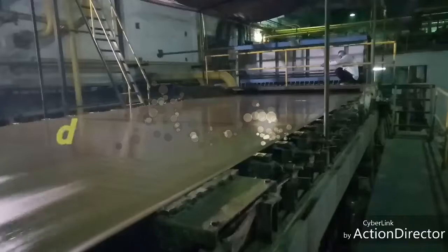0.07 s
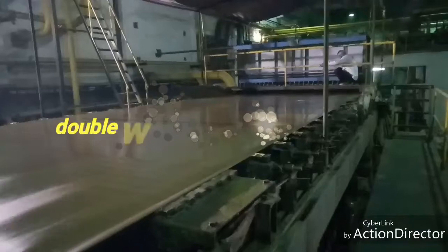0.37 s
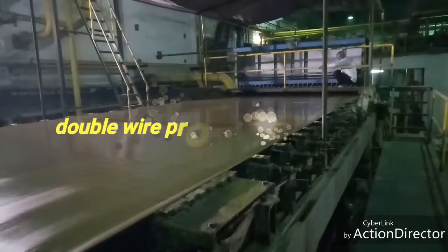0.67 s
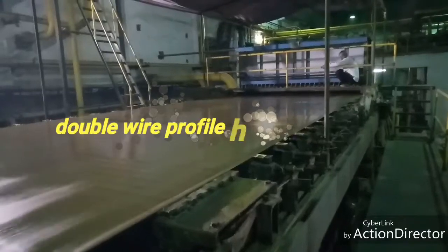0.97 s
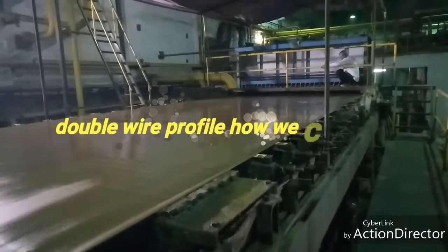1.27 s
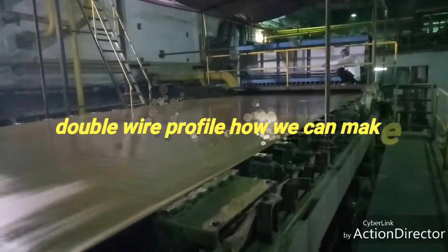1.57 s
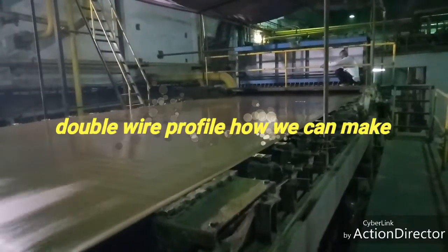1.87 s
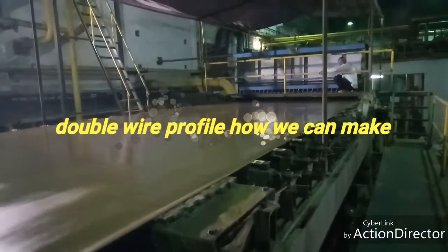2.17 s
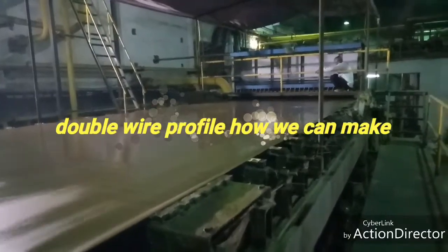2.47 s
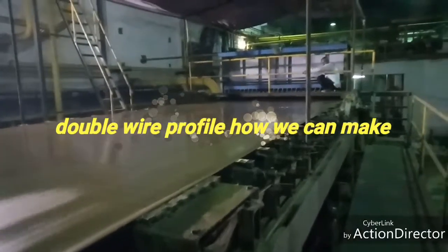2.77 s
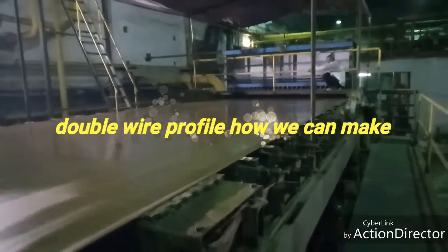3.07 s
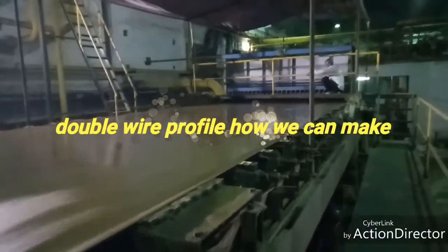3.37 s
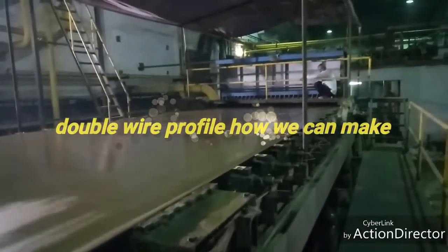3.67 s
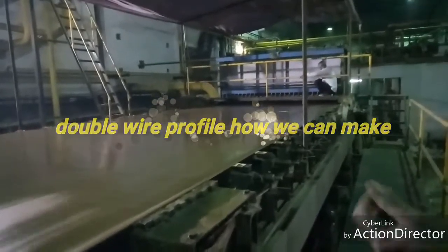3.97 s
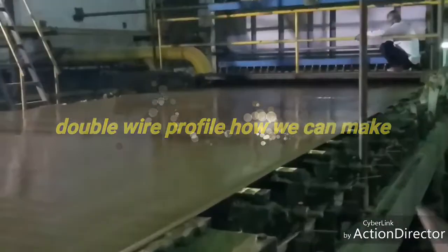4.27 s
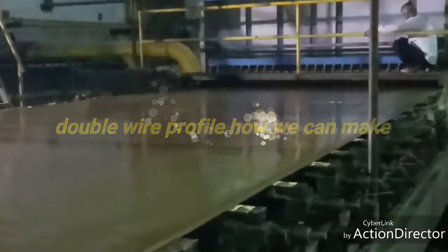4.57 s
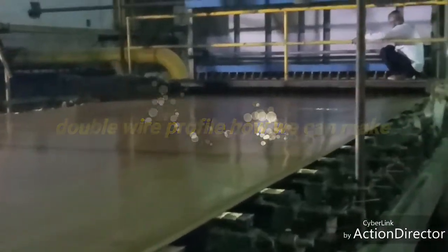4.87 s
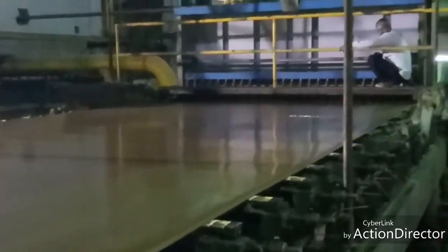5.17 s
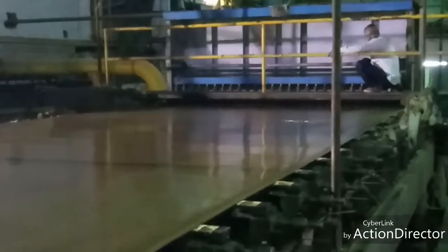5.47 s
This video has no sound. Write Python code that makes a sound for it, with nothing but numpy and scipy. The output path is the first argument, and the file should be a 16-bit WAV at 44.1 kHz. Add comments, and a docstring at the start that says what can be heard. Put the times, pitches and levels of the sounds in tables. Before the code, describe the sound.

A shrill, stuttering squeal rides over the steady roar, hum and watery hiss of a large machine in an echoing mill.

```python
"""A rubbing part of a paper machine squeals, shrill and fluttering, as it bites and slips.
Behind it, drives and pumps hum and throb, water hisses off the moving wire, and the rolls
and pumps blend into a deep roar. The machine is on the left of a big mill hall whose echoes
smear the tones. The sound fades in after a short silence; one dry click comes near the end."""
import sys
import numpy as np
from scipy import signal
from scipy.fft import rfft, irfft, next_fast_len
from scipy.io import wavfile
from scipy.ndimage import uniform_filter1d, map_coordinates

SR = 44100
rng = np.random.default_rng(int(sys.argv[2]) if len(sys.argv) > 2 else 0)


def dump_mix(stems):
    """Bounce the given channels to the path in sys.argv[1] as a 16-bit WAV at rate SR."""
    frames = np.atleast_2d(stems).T  # one column per channel
    limited = np.clip(frames, -1, 1)  # hard clip at full scale
    pcm = np.round(limited * 32767).astype(np.int16)
    wavfile.write(sys.argv[1], SR, pcm)


N = 243873


def amp(db):
    """Decibels to gain."""
    return 10 ** (np.asarray(db) / 20)


def unit(x):
    """Scale to rms 1."""
    return x / np.sqrt(np.mean(np.abs(x) ** 2) + 1e-20)


def over_freq(rows, hz):
    """Interpolate (freq_hz, value) rows on a log axis."""
    freq_hz, values = np.transpose(rows)
    return np.interp(np.log(hz + 1), np.log(freq_hz + 1), values)


def over_time(rows):
    """Interpolate (time_s, value) rows to one value per sample."""
    return np.interp(np.arange(N) / SR, *np.transpose(rows))


def wobble(rate_hz):
    """Smooth random curve, rate_hz knots a second."""
    coarse = np.arange(0, N + 64, 64)
    spline = map_coordinates(rng.standard_normal(2048), [coarse * rate_hz / SR], mode="wrap")
    return np.interp(np.arange(N), coarse, spline)


def swell(middle_s, length_s):
    """Power envelope: quick rise, hold at 1, quick fall."""
    distance = np.minimum(np.abs(2 * (np.arange(N) / SR - middle_s) / length_s), 10)
    return np.exp(-distance ** 4)


def filtered(x, response):
    """Apply the gain response(hz) by FFT."""
    size = next_fast_len(N + 8192)
    return irfft(rfft(x, size) * response(np.fft.rfftfreq(size, 1 / SR)), size)[..., :N]


# Likeness of the two sides: freq_hz, coherence
HALL_COHERENCE = [(60, .98), (180, .97), (380, .84), (600, .42), (1000, .26), (1250, 0), (1700, -.25),
                  (2200, -.08), (2700, .15), (3600, 0)]
# Left side over right: freq_hz, excess_db
LEFT_EXCESS = [(60, 7.5), (300, 8), (800, 6.5), (1100, 8), (2000, 8), (3300, 10), (4300, 13), (5500, 8),
               (6600, 5.5), (7300, -0.5), (10000, 0.5), (13000, 17)]


def hall_noise(colour_db, patchy_db):
    """Diffuse stereo noise of rms 1, with patches of random gain, leaning left."""
    def mid_side_gain(hz):
        angle = np.arccos(over_freq(HALL_COHERENCE, hz)) / 2
        return amp(colour_db(hz)) * [np.cos(angle), np.sin(angle)]

    spectra = signal.stft(rng.standard_normal((2, N)), nperseg=512)[2]
    patches = uniform_filter1d(rng.standard_normal(spectra.shape[1:]), 7, axis=0)
    patches = unit(uniform_filter1d(patches, 12, axis=1))
    noise = signal.istft(spectra * amp(patchy_db * patches), nperseg=512)[1][:, :N]
    mid, side = filtered(noise, mid_side_gain)
    lean_left = lambda hz: amp([0 * hz, -over_freq(LEFT_EXCESS, hz)])
    return unit(filtered(np.array([mid + side, mid - side]), lean_left))


def hall_scatter(width_hz):
    """Many hall paths summed: a random complex gain per side that spreads a tone into a band."""
    hz = np.fft.fftfreq(next_fast_len(N), 1 / SR)
    paths = rng.standard_normal((2, len(hz))) + 1j * rng.standard_normal((2, len(hz)))
    return unit(np.fft.ifft(paths / np.sqrt(1 + (hz / width_hz) ** 4))[:, :N])


# Roll and pump noise: freq_hz, relative_density_db
ROAR_SPECTRUM = [(22, -12), (39, -22), (60, -8.5), (100, 1.8), (170, 2), (250, 2), (320, 1.5), (420, -3),
                 (560, -5.5), (820, -7.5), (910, -8.5), (1060, -6.5), (1250, -9.5), (2000, -16.5)]


def roar(level_db=-20, edge_hz=2100):
    """Rolls and pumps blend in the hall into a deep, nearly even roar."""
    colour_db = lambda hz: over_freq(ROAR_SPECTRUM, hz) - 10 * np.log10(1 + (hz / edge_hz) ** 10)
    swell_db = 0.12 * wobble(2.5) + 0.3 * wobble(14)
    return amp(level_db + swell_db) * hall_noise(colour_db, patchy_db=1)


# Water spraying and draining: freq_hz, relative_density_db
SPRAY_SPECTRUM = [(900, -25), (1700, -0.5), (2800, 2.5), (3700, 3), (4400, 1), (5100, -9), (6000, -11.5),
                  (6500, -9.5), (7600, -19), (8100, -24), (9000, -28.5), (11000, -29), (13000, -25),
                  (15000, -28.5)]


def spray(level_db=-27):
    """Water flung and sucked from the wire makes a smooth hiss."""
    colour_db = lambda hz: over_freq(SPRAY_SPECTRUM, hz)
    swell_db = 0.2 * wobble(3.12) + 0.046 * wobble(22)
    return amp(level_db + swell_db) * hall_noise(colour_db, patchy_db=0.66)


# Drive, gear and pump tones: pitch_hz, left_db, right_db
HUM_TONES = [(100.1, -42, -49), (126.1, -38, -45), (127.0, -35, -43), (176.5, -40, -49), (199.5, -35, -44),
             (243.5, -34, -43), (252.4, -39, -46), (259.4, -38, -47), (265.9, -34, -41), (268.5, -38, -49),
             (291.4, -35, -44), (316.4, -40, -48), (343.3, -42, -52), (391.1, -40, -46), (399.0, -42, -53),
             (458.2, -44, -50), (533.0, -42, -60), (557.9, -41, -50), (561.9, -36, -55), (611.8, -36, -53),
             (661.6, -43, -45), (724.7, -47, -42), (749.6, -41, -58), (772.6, -42, -53),
             (774.5, -31.7, -45), (780.5, -38, -47), (799.5, -45, -46), (824.4, -38.2, -40.5),
             (830.4, -38.5, -46.5), (849.3, -45, -56), (855.3, -46, -57), (1015.5, -46, -50),
             (1038.6, -37, -46), (1041.0, -33.5, -44), (1049.0, -35, -53), (1065.9, -42, -48),
             (1088.5, -41, -56), (1090.9, -46, -43), (1098.8, -41, -65), (1140.8, -45, -54),
             (1197.1, -42, -50), (1317.4, -40, -53), (1354.4, -47, -55), (1396.5, -48, -60),
             (1623.9, -40.5, -52), (1854.4, -48, -55), (1904.3, -48, -61), (3271.6, -47.5, -54)]


def drive_hum(waver=0.24, waver_rate_hz=8, apart_hz=1300):
    """Steady machine tones; weak echoes waver their level and phase, and close pairs beat."""
    t = np.arange(N) / SR
    out = np.zeros((2, N))
    echoes = [waver * wobble(waver_rate_hz) for _ in range(8)]
    for pitch_hz, left_db, right_db in HUM_TONES:
        lag_rad = min(pitch_hz / apart_hz, 1) ** 2 * rng.normal()  # short waves differ more by side
        phase = 2 * np.pi * (pitch_hz * t + rng.random())
        for side, level_db in enumerate([left_db, right_db]):
            gain_pick, phase_pick = rng.permutation(len(echoes))[:2]
            tone = np.cos(phase + side * lag_rad + echoes[phase_pick])
            out[side] += amp(level_db) * unit((1 + echoes[gain_pick]) * tone)
    return out


# Drives beating with the loudest one: slower_by_hz, in_phase_s, relative_db
BEATING_DRIVES = [(4.0, .238, -2), (2.53, .372, -8.5), (11.6, .063, -12), (-3.4, .132, -13)]
# Slow level changes of the throb: time_s, gain_db
THROB_GAIN = [(.45, -6), (1.05, 3), (1.65, -2), (1.97, 3.5), (2.3, -0.5), (2.9, -1), (5.5, -1.5)]


def drive_throb(pitch_hz=512, left_db=-29, right_db=-35, waver=0.12):
    """Drives at nearly the same speed beat: their tone swells and fades a few times a second."""
    t = np.arange(N) / SR
    beating = 1 + sum(amp(relative_db) * np.exp(-2j * np.pi * slower_by_hz * (t - in_phase_s))
                      for slower_by_hz, in_phase_s, relative_db in BEATING_DRIVES)
    tone = (beating * np.exp(2j * np.pi * pitch_hz * t)).real
    level_db = over_time(THROB_GAIN) + [[left_db], [right_db]]
    return amp(level_db) * unit((1 + waver * wobble(6.4)) * tone)


# Impulse of the click: start_s, impulse_db
CLICK_IMPULSE = (5.4233, -11.5)


def click(right_gain_db=-5.5, cutoff_hz=9000):
    """One brief, dry click, louder in the left channel."""
    start_s, impulse_db = CLICK_IMPULSE
    impulse = amp(impulse_db) * (np.arange(N) == round(start_s * SR))
    return amp([[0], [right_gain_db]]) * filtered(impulse, lambda hz: 1 / (1 + 1j * hz / cutoff_hz))


def slips(depth, rate_hz, jitter, sharpness):
    """Gain of rms 1 with short, uneven dips where the contact lets go."""
    cycles = rng.random() + np.cumsum(rate_hz * np.exp(jitter * wobble(rate_hz))) / SR
    return unit(1 - depth * np.abs(np.cos(np.pi * cycles)) ** (2 * sharpness))


# Flares of the squeal's octave: middle_s, level_db
OCTAVE_FLARES = [(.494, -30), (.564, -28), (.623, -28), (.736, -31), (1.327, -30), (1.41, -30),
                 (1.502, -30), (1.733, -30), (1.797, -27), (2.06, -31), (2.196, -38), (2.345, -27),
                 (2.503, -24.5), (2.735, -28), (2.812, -27), (2.92, -35), (2.973, -25.5), (3.381, -24.5),
                 (3.488, -27), (3.619, -42), (3.92, -32), (4.147, -28), (4.284, -36), (4.463, -35),
                 (4.558, -29), (4.759, -30), (5.045, -34), (5.193, -29), (5.263, -32), (5.448, -32)]


def octave_envelope(base_db=-35.5, flare_s=0.039, rough_db=2):
    """Amplitude of the squeal's octave: faint slipping with brief, rough flares."""
    rubbing = amp(base_db) * slips(depth=0.69, rate_hz=14, jitter=0.269, sharpness=2.2)
    flare_power = sum(amp(level_db) ** 2 * swell(middle_s, flare_s)
                      for middle_s, level_db in OCTAVE_FLARES)
    return np.sqrt(rubbing ** 2 + flare_power) * unit(amp(rough_db * wobble(60)))


# Bites of the rubbing part: middle_s, length_s, level_db
BITES = [(0.192, 0.052, -13), (0.271, 0.07, -17), (0.4, 0.03, -24), (0.493, 0.032, -26),
         (0.541, 0.038, -19.5), (0.612, 0.042, -22.5), (0.704, 0.032, -20), (0.784, 0.1, -21.5),
         (.865, .05, -23.5), (0.97, 0.071, -24.5), (1.123, 0.11, -15.5), (1.283, 0.087, -21),
         (1.473, 0.052, -19.5), (1.529, 0.022, -15.5), (1.595, 0.038, -15), (1.699, 0.044, -17.5),
         (1.823, 0.017, -20), (1.895, 0.058, -15.5), (1.97, 0.019, -20.5), (2.053, 0.072, -17),
         (2.216, 0.081, -17.5), (2.315, 0.031, -18), (2.372, 0.083, -21), (2.515, 0.075, -17),
         (2.585, 0.036, -16.5), (2.64, .05, -24), (2.72, .06, -16.5), (2.798, 0.051, -18.5),
         (2.897, .065, -20.5), (2.99, 0.031, -16.5), (3.106, 0.067, -16.5), (3.205, .055, -16.5),
         (3.31, 0.04, -22.5), (3.397, 0.038, -24), (3.463, 0.048, -20), (3.51, .04, -21),
         (3.578, 0.036, -25), (3.682, 0.079, -20.5), (3.827, 0.13, -14), (3.955, 0.098, -17),
         (4.092, 0.086, -14.5), (4.195, 0.12, -16.5), (4.318, 0.046, -15), (4.404, 0.049, -21.5),
         (4.49, 0.072, -15), (4.586, 0.035, -19), (4.785, 0.069, -13.5), (4.96, 0.11, -21),
         (5.035, 0.058, -15.5), (5.142, .1, -15.5), (5.254, 0.053, -16.5), (5.327, 0.052, -19),
         (5.453, 0.1, -25.5)]


def bite_envelope(slip_db=-29, shudder_hz=29, rough_db=0.53):
    """Amplitude of the fundamental: the part bites about ten times a second, shudders, lets go."""
    bite_power = sum(amp(level_db) ** 2 * swell(middle_s, length_s)
                     for middle_s, length_s, level_db in BITES)
    shudder = 1 + 0.17 * np.cos(2 * np.pi * shudder_hz * np.arange(N) / SR + wobble(5))
    roughness = amp(rough_db * wobble(75))
    return np.sqrt(amp(slip_db) ** 2 + bite_power) * unit(shudder * roughness)


def partial_gain(direct, echo_db, flutter_hz, halo_db, follow_share=0.21):
    """Complex gain per side: direct sound left, fluttering echo, hissy halo swelling with the rub."""
    effort = unit(1 - follow_share + follow_share * unit(direct))
    halo = amp(halo_db)[:, None] * effort * hall_scatter(width_hz=127)
    echo = amp(echo_db)[:, None] * hall_scatter(width_hz=flutter_hz)
    return np.outer([1, 0], direct) + echo + halo


def squeal(pitch_hz=2365.3, drift_hz=1.317, waver_hz=3):
    """A rubbing part sings on one pitch with two overtones; the hall makes them flutter."""
    freq_hz = pitch_hz + drift_hz * wobble(3) + waver_hz * wobble(20)
    carrier = np.exp(2j * np.pi * np.cumsum(freq_hz) / SR)
    first = partial_gain(bite_envelope(), echo_db=[-32, -32], flutter_hz=10, halo_db=[-29.2, -41.3])
    second = partial_gain(octave_envelope(), echo_db=[-41, -43.5], flutter_hz=14, halo_db=[-42, -53])
    third = partial_gain(0, echo_db=[-48.5, -54.5], flutter_hz=8, halo_db=[-53, -56])
    return np.sqrt(2) * (first * carrier + second * carrier ** 2 + third * carrier ** 3).real


def scene():
    """The machine, heard from the walkway beside the wire, plus one click."""
    return roar() + spray() + drive_hum() + drive_throb() + click() + squeal()


# Opening fade: time_s, gain
FADE_IN = [(.176, 0), (.177, 0.052), (.25, 0.31), (.36, 0.67), (.46, 1)]


def record(dry, top_hz=15450):
    """Fade in and cut everything above top_hz."""
    return filtered(dry * over_time(FADE_IN), lambda hz: hz < top_hz)


dry = scene()
out = record(dry)
dump_mix(out)
```